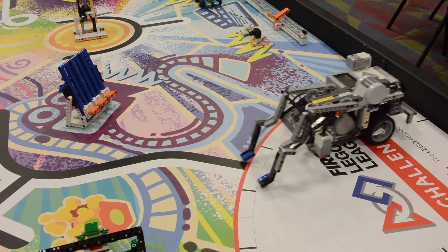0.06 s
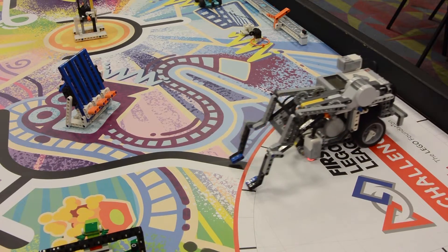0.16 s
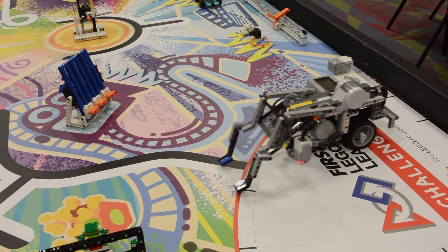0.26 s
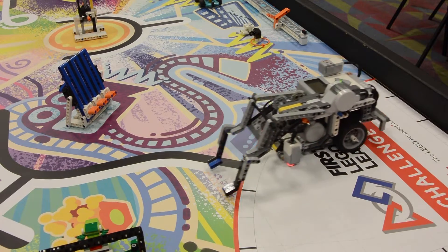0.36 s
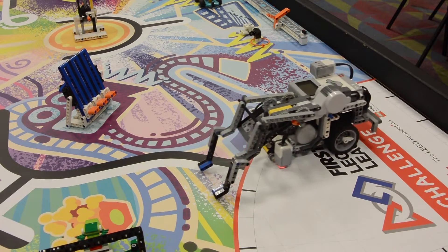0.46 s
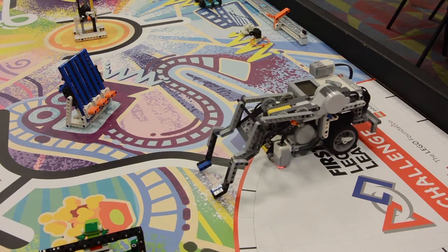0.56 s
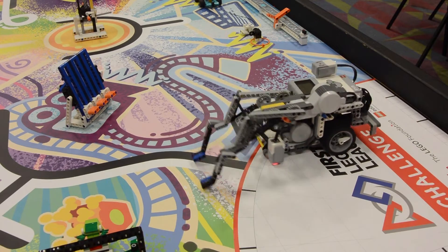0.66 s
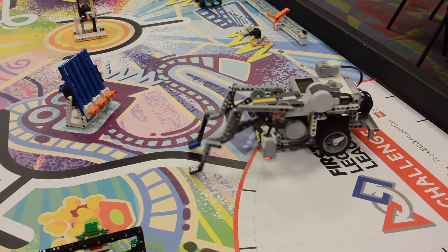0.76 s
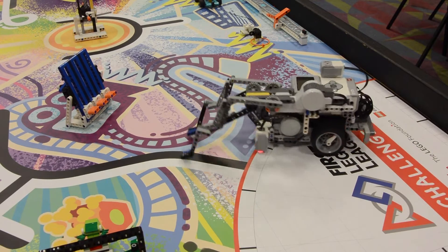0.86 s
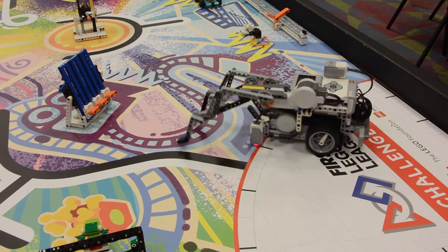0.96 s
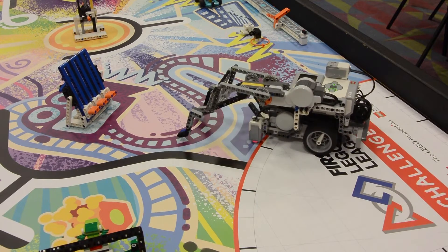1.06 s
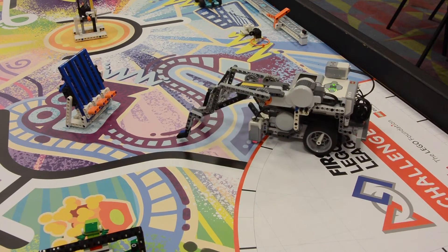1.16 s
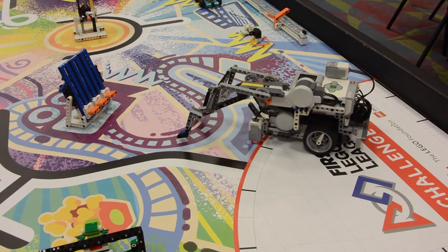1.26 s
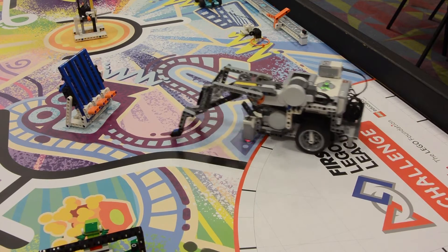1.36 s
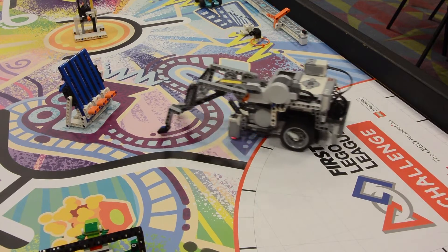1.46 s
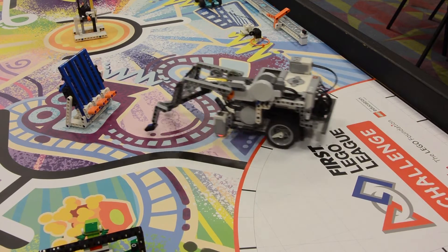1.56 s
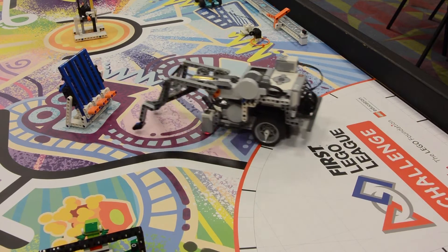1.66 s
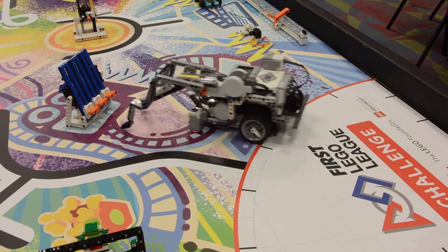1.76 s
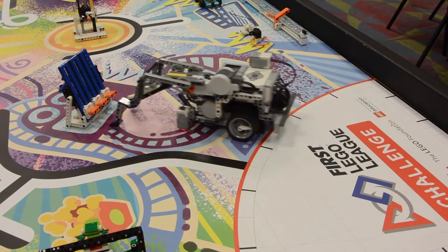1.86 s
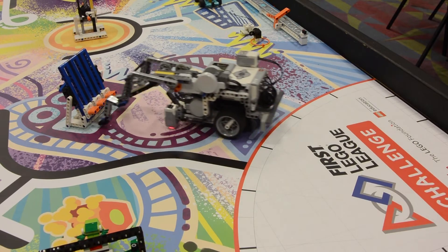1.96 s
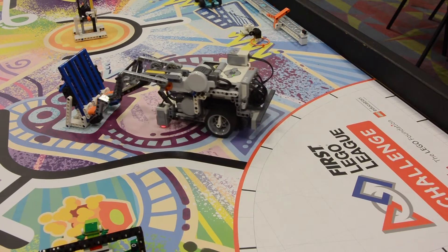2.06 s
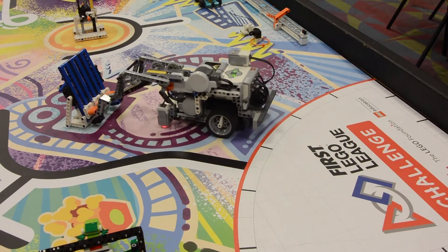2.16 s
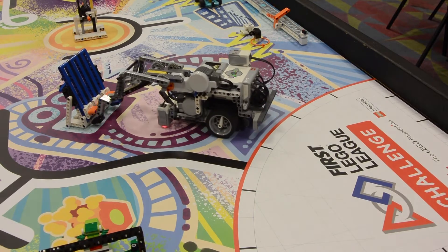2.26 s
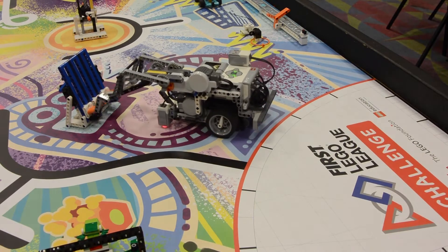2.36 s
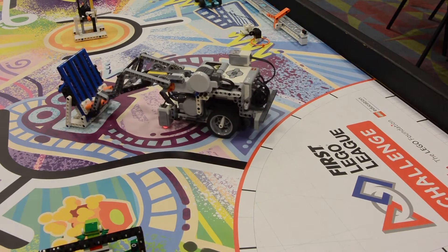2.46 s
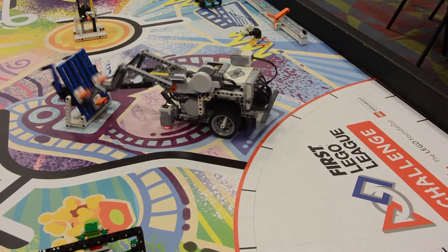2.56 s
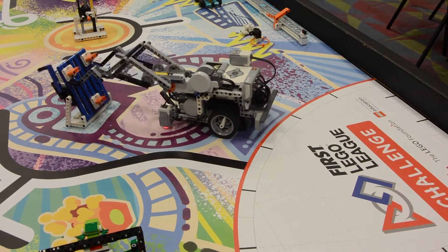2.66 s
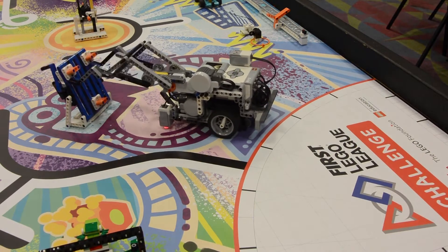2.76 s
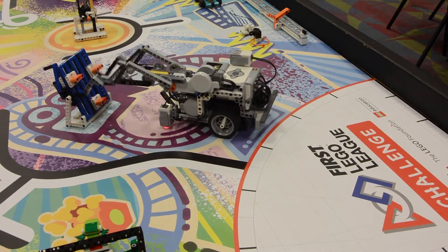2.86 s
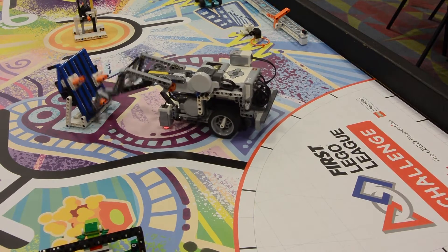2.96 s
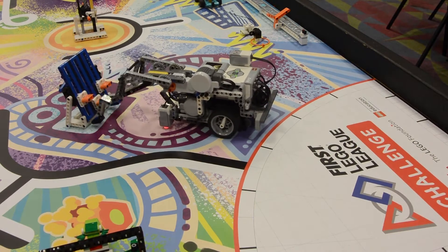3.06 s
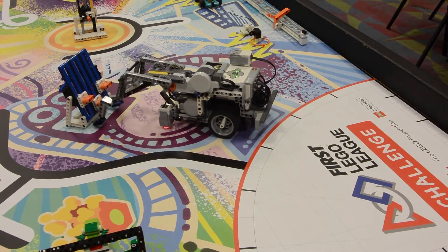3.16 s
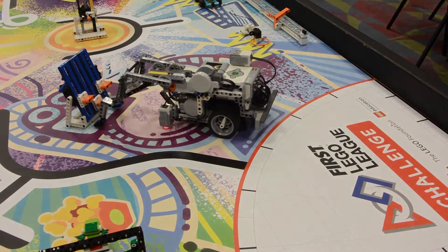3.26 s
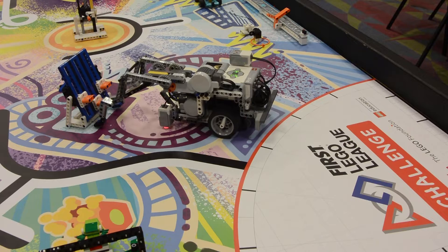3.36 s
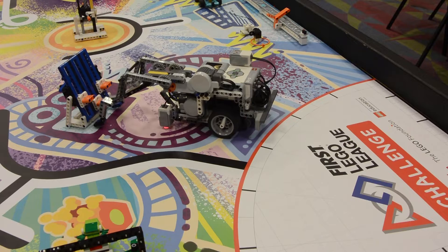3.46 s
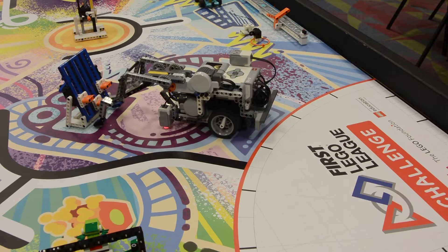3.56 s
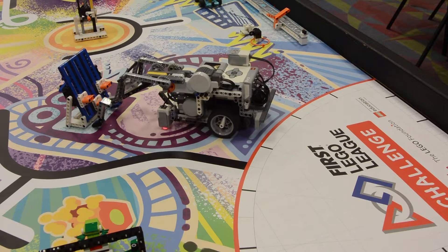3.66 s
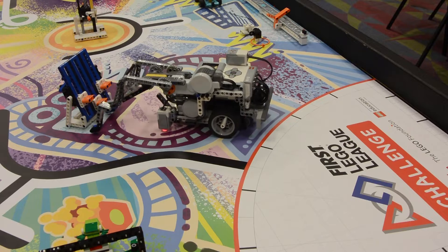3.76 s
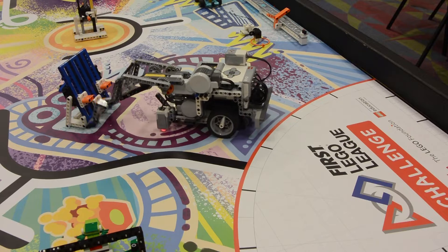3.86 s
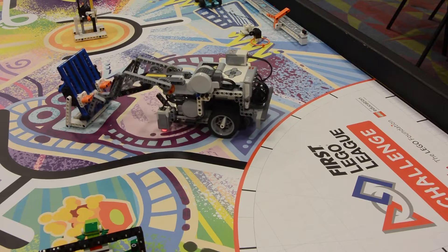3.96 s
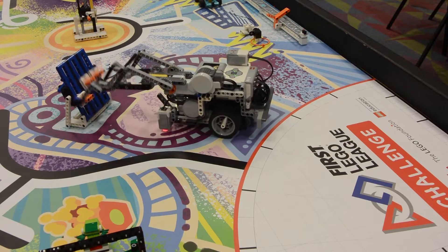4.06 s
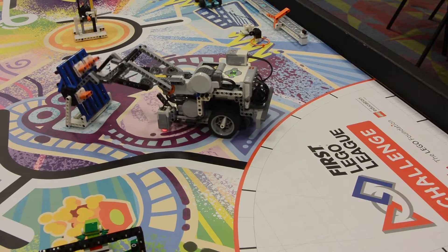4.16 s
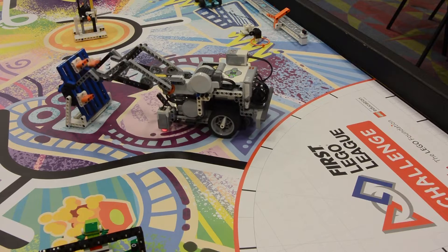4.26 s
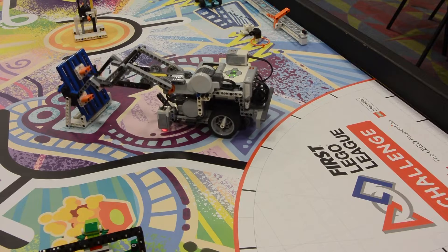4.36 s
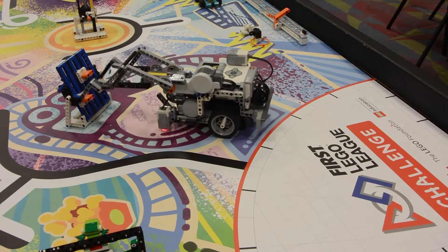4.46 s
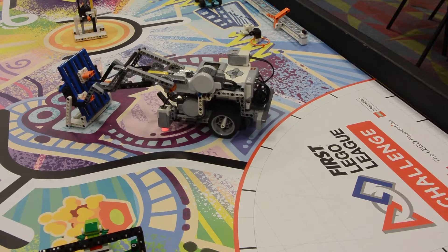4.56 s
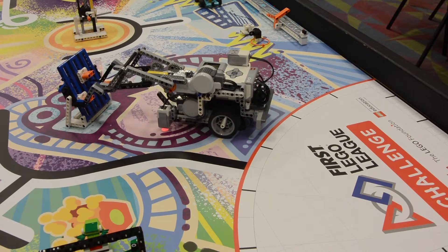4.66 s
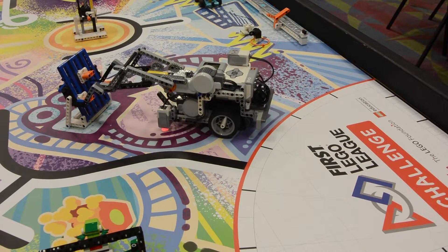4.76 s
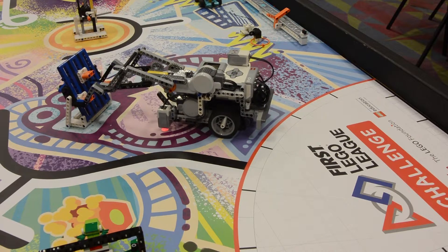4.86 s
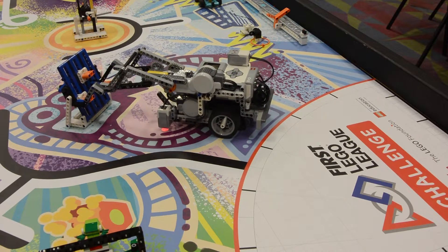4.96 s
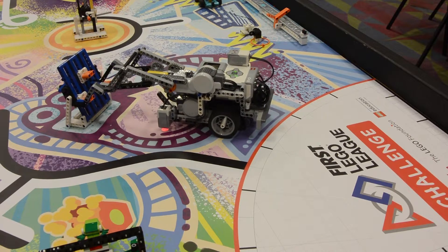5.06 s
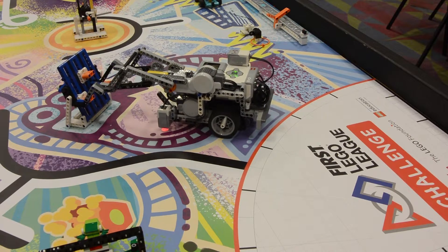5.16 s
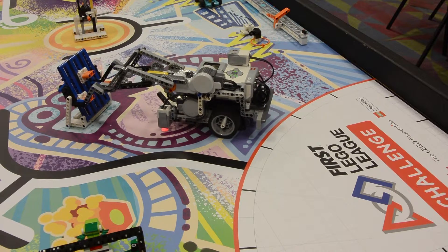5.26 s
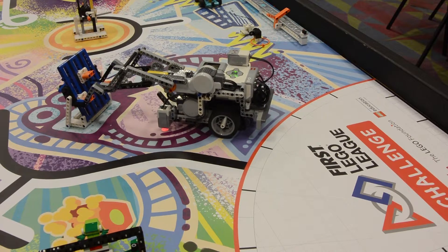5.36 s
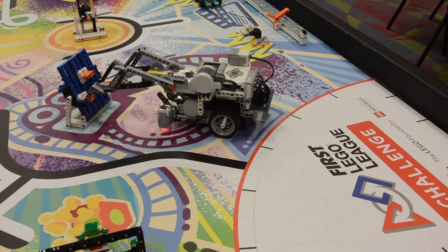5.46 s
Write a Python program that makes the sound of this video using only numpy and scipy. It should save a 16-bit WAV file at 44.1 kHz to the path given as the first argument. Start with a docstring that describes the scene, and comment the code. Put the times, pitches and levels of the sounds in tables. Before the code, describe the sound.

Small motors and plastic gears whir and rattle in three driving bursts, then an arm whines and clacks twice against a plastic model.

```python
"""A toy robot's rattling wheels are heard first: it drives over a table top in three bursts, then works
its arm twice against a plastic model. Motor and gear whine is a set of gliding lines and harmonics;
loose teeth are random ticks and hiss ringing the plastic housings; parts meet as clicks and knocks of
coloured noise. A small room of sparse echoes rings briefly over the hum of a fan, filtered noise for
room rumble and the hiss of a two-port microphone, and a few faint high blips."""
import sys
import numpy as np
from scipy import signal
from scipy.fft import rfft, irfft
from scipy.io import wavfile
from scipy.ndimage import uniform_filter1d

SR = 44100
rng = np.random.default_rng(int(sys.argv[2]) if len(sys.argv) > 2 else 0)


def dump(signal):
    """Clip the signal to [-1, 1] and save it as 16-bit WAV at the path in sys.argv[1]."""
    limited = np.clip(np.atleast_2d(signal).T, -1, 1)
    pcm = np.round(limited * 32767).astype(np.int16)
    wavfile.write(sys.argv[1], SR, pcm)


N = 242550  # samples

# arm motor speed under load, one table a pull: t/s, tooth mesh f/Hz
ARM_MESH = [
    [(2.4435, 110), (2.5, 340), (2.518, 371), (2.535, 377), (2.56, 362), (2.59, 335), (2.62, 314),
     (2.682, 313), (2.72, 355), (2.765, 410)],
    [(3.944, 95), (3.97, 240), (4.0, 345), (4.035, 389), (4.08, 357), (4.12, 330), (4.165, 341), (4.2, 382),
     (4.235, 433), (4.285, 430)],
    [(4.3505, 60), (4.375, 230), (4.41, 330), (4.445, 250)],
    [(4.54, 444), (4.56, 426), (4.595, 397), (4.655, 380)],
]
# broad colour of the arm housing: f/Hz, relative level/dB per Hz
ARM_HOUSING = [(240, -77), (400, -25), (1330, -12), (1470, -8.5), (2040, -5), (2930, -0.5), (3590, -3.5),
               (4500, -8), (5630, -5), (8000, -1.5), (10400, -18), (17600, -120)]
# pitch waver of a gliding line, as a share per (pitch change share per s)
BLUR_S = .012


def gain_of(db):
    """Turns dB into an amplitude gain."""
    return 10 ** (np.asarray(db) / 20)


def evened(x):
    """Scales to rms 1."""
    return x / np.sqrt(np.mean(x ** 2) + 1e-20)


def read(points, hz):
    """Reads a spectrum table on a log-frequency axis."""
    f, value = np.transpose(points)
    return np.interp(np.log(hz + 1), np.log(f + 1), value)


def add(mix, s, sound):
    """Mixes a sound in at time s, cut at the end of the mix."""
    part = mix[round(max(s, 0) * SR):][:len(sound)]
    part += sound[:len(part)]


def unroll(rows):
    """Gives the start time of a table and its columns interpolated to every sample."""
    s, *columns = np.transpose(rows)
    t = np.arange(s[0], s[-1], 1 / SR)
    return s[0], [np.interp(t, s, c) for c in columns]


def wander(size, seconds):
    """Slow random drift of rms 1: noise smoothed twice over the given time."""
    span = round(seconds * SR)
    smooth = uniform_filter1d(rng.standard_normal(size), span)
    return evened(uniform_filter1d(smooth, span))


def housing(colour, modes, base_db):
    """Minimum-phase impulse response of a plastic shell: a broad colour with resonances standing on it."""
    hz = abs(np.fft.fftfreq(4096, 1 / SR))
    power = gain_of(2 * (read(colour, hz) + base_db)) + 1e-10
    for f, width, db in modes:
        power = power + gain_of(2 * db) / (1 + (2 * (hz - f) / width) ** 2) ** 2
    log_gain = np.log(power) / 2
    phase = -signal.hilbert(log_gain).imag
    return np.fft.ifft(np.exp(log_gain + 1j * phase)).real[:2048]


def rattle(size, ticks_per_s, spread_db, hiss):
    """Loose teeth tick at random with uneven force, over the hiss of sliding plastic."""
    force = gain_of(spread_db * np.minimum(rng.exponential(1, size), 4))
    struck = rng.random(size) < ticks_per_s / SR
    ticks = force * rng.standard_normal(size) * struck
    return evened(evened(ticks) + hiss * rng.standard_normal(size))


def teeth(hz):
    """Amplitude beat with one decaying burst for every tooth that meets, at an even mean power."""
    decay_s, floor = .0016, .16  # the floor keeps some sound between the bursts
    since_s = (np.cumsum(hz) / SR % 1) / hz
    gate = floor + np.exp(-since_s / decay_s)
    return gate / np.sqrt(uniform_filter1d(gate ** 2, 600))


def air():
    """Room rumble and microphone hiss: slightly patchy noise, partly alike in the two ports."""
    level_db = -58  # rms
    # colour of the air: f/Hz, relative level/dB per Hz
    air_colour = [(12, -39.5), (20, -5), (27, -10), (81, -46), (112, -8.5), (256, -9), (390, -11),
                  (722, -10), (1300, -16), (10100, -25.5), (13700, -29), (16200, -35)]
    # left-right likeness: f/Hz, correlation [-1 to 1]
    likeness = [(60, 0.97), (180, 0.96), (550, 0.85), (1650, 0.28), (4970, -0.25), (15000, 0.5)]
    frames, hz = N // 256 + 5, np.fft.rfftfreq(1024, 1 / SR)
    a, b, c, d, patches = rng.standard_normal((frames, 513, 5)).T
    patches_db = evened(uniform_filter1d(uniform_filter1d(patches, 8, 0), 14, 1))
    same = np.clip(read(likeness, hz), -1, 1)[:, None]
    left = a + 1j * b
    right = same * left + np.sqrt(1 - same ** 2) * (c + 1j * d)
    z = np.array([left, right]) * gain_of(read(air_colour, hz)[:, None] + patches_db)
    return gain_of(level_db) * evened(signal.istft(z, nperseg=1024, noverlap=768)[1][:, :N])


def fan():
    """A wavering line, its height and phase drifting slowly, over a low hum that swells and ebbs."""
    # wavering line: f/Hz, width/Hz (sets the drift speed), peak level/dB before the drift
    fan_lines = [(708, 5, -66.5)]
    # swell of the hum: t/s, rms level/dB before its flutter
    hum_level = [(0, -80), (.75, -76.5), (1, -66.5), (1.55, -70), (1.64, -76), (4.6, -77), (4.75, -68.5),
                 (5.28, -71), (5.4, -80)]
    hum_hz = 118
    t = np.arange(N) / SR
    out = np.zeros(N)
    for hz, width, db in fan_lines:
        height = gain_of(db) * (1 + wander(N, .5 / width) / 5)
        out += height * np.cos(2 * np.pi * hz * t + wander(N, .5 / width))
    hum_gain = gain_of(np.interp(t, *np.transpose(hum_level)) + 2.0 * wander(N, 0.072))
    hum = np.sin(2 * np.pi * hum_hz * t + 0.53 * wander(N, 0.089))
    return out + np.sqrt(2) * hum_gain * hum


def blips():
    """A few faint high blips: a sine with a jittering phase under bell-shaped envelopes."""
    # middle of each blip: t/s, rms level/dB at its top
    blip_rows = [(3.48, -76), (4.945, -76), (5.45, -74)]
    blip_hz, width_s = 11400, .03  # width between the 1/e points
    t = np.arange(N) / SR
    envelope = sum(gain_of(db) * np.exp(-((t - s) / width_s * 2) ** 2) for s, db in blip_rows)
    return np.sqrt(2) * envelope * np.sin(2 * np.pi * blip_hz * t + 3 * wander(N, .003))


def room(x):
    """Three tails of random echoes, each band dying at its own speed, take turns to keep the room's colour even."""
    # reverberation: f/Hz, t60/s
    t60 = [(500, 0.09), (1500, 0.53), (4000, 0.47), (9000, 0.38), (15000, 0.22)]
    taps = np.zeros((3, 2, 22000))  # tail, port, sample
    at = np.arange(60, 21980, 20) + rng.integers(0, 20, (3, 2, 1096))
    np.put_along_axis(taps, at, rng.choice([-1., 1.], at.shape), 2)
    hz, t, z = signal.stft(taps, SR, nperseg=256)
    decay = gain_of(-60 * t / read(t60, hz)[:, None])
    tails = signal.istft(z * decay, SR, nperseg=256)[1]
    tails = tails / np.linalg.norm(tails[0, 0])
    # a steady rotation; the squared shares of the three tails always sum to 1
    turn = np.arange(N) / SR / .15 + np.arange(3)[:, None] / 3
    share = np.cos(np.pi * turn) * np.sqrt(2 / 3)
    return signal.fftconvolve((share * x)[:, None], tails, axes=2).sum(0)[:, :N]


def radiate(x):
    """Many parts sound from shifting places: colour drifts in patches and the two ports hear unlike phases."""
    # phase spread between the ports: f/Hz, rms phase/radians
    scatter = [(300, 0.092), (1000, 0.2), (2500, 1.06), (5000, 0.96), (9000, 0.94), (14000, 1.94)]
    patchy_db = .7  # rms
    hz, t, z = signal.stft(x, SR, nperseg=256, noverlap=192)
    colour, phase = rng.standard_normal((len(t), len(hz), 2)).T
    colour = evened(uniform_filter1d(uniform_filter1d(colour, 4, 0), 30, 1))
    phase = evened(uniform_filter1d(uniform_filter1d(phase, 4, 0), 150, 1))
    turn = np.exp(.5j * read(scatter, hz)[:, None] * phase)
    ports = z * gain_of(patchy_db * colour) * np.array([turn, 1 / turn])
    return signal.istft(ports, SR, nperseg=256, noverlap=192)[1][:, :N]


def growl(gain):
    """Low rattle in the table top: sparse, uneven ticks through the colour of the board."""
    # colour of the table: f/Hz, relative level/dB per Hz
    table_colour = [(150, -21), (330, -11.5), (560, 2), (1000, -6.5), (1400, -1.5), (2000, -26)]
    ticks = rattle(N, 800, 2.2, 0.5)
    return gain * evened(signal.oaconvolve(ticks, housing(table_colour, [], 0))[:N])


def burst(colour, luck, rise_s, t60):
    """A sharp contact and dense short-lived plastic modes as a coloured puff of noise; peak 1."""
    t = np.arange(len(luck)) / SR
    contact = 2. * (np.arange(len(luck)) == round(rise_s * SR))
    puff = luck * gain_of(-60 * t / t60) * (1 - np.exp(-t / rise_s))
    sound = signal.oaconvolve(contact + puff, housing(colour, [], 0))
    return sound / abs(sound).max()


def clicks():
    """Plastic parts meet: a bright snap, the hollow part behind it, and a slower thud through the table."""
    # contacts: t/s, snap peak level/dB, thud level/dB relative to the snap
    contacts = [(0.591, -29.5, -36), (0.621, -31, -35), (0.635, -33, -36), (0.6473, -28, -40),
                (0.66, -33, -33), (0.662, -29, -36), (1.1488, -29, -31), (1.154, -35, -32),
                (1.1735, -39, -28), (1.1815, -39, -27), (1.271, -43, -16), (1.3781, -40, -4.5),
                (2.14, -21.5, -49), (2.151, -20, -26), (2.279, -35, -14), (2.328, -32.5, -16),
                (2.6, -17.5, -20), (2.6959, -15.5, -28), (2.7478, -11.5, -22.5), (2.8052, -23, -12.5),
                (2.8865, -30, -46), (2.9066, -26, -40), (2.9166, -24, -32), (2.939, -25, -37),
                (2.957, -15, -16), (2.981, -27, -41), (2.985, -28, -40), (2.9917, -23, -40),
                (3.0448, -22, -13), (3.142, -19.5, -15), (3.1547, -13, -21), (3.691, -37.5, -24),
                (3.716, -32.5, -30), (3.7717, -22, -37), (3.841, -35, -35.5), (3.868, -30, -34),
                (3.872, -27.5, -34), (3.944, -28, -29), (4.13, -16, -27), (4.143, -12.5, -36),
                (4.2035, -26.5, -8.5), (4.3198, -14.5, -20), (4.35, -19, -14), (4.427, -21, -36),
                (4.4335, -21, -43), (4.448, -21.5, -19), (4.4632, -11, -28)]
    # colours of the three parts: f/Hz, relative level/dB
    snap_colour = [(3500, -32), (5800, -7.5), (8000, 0.5), (10000, -7.5), (12000, -19), (16000, -29)]
    body_colour = [(700, -21), (1400, -8), (2700, -2.5), (4200, -0.5), (6000, -30.5)]
    thud_colour = [(90, -35), (170, -7.5), (550, -6.5), (900, -8), (1400, -16)]
    # harder clicks are more snap and less body: body dB relative to the snap
    body_db, body_per_db = -13.5, -0.14
    # softer clicks snap lower, by this share of the pitch per dB under the hardest
    drop_per_db = .011
    out = np.zeros(N)
    luck = rng.standard_normal((len(contacts), 3, 4000))
    hardest = max(row[1] for row in contacts)
    for (s, db, thud_db), (a, b, c) in zip(contacts, luck):
        lowered = np.multiply(snap_colour, [1 - drop_per_db * (hardest - db), 1])
        snap = burst(lowered, a, 0.0006, 0.011)
        body = gain_of(body_db + body_per_db * db) * burst(body_colour, b, 0.000997, 0.016)
        thud = gain_of(thud_db) * burst(thud_colour, c, 0.0028, 0.15)
        add(out, s, gain_of(db) * (snap + body + thud))
    return out


def lurch():
    """A swell as the third run gets under way: climbs from 0 to 1, then breaks off."""
    # t/s of the start, the top and the end
    lurch_s = (1.43, 1.553, 1.562)
    return np.interp(np.arange(N) / SR, lurch_s, [0, 1, 0])


def wheel_level(t, start, off, first_db, last_db):
    """Level in dB: spins up, holds with a straight drift, and coasts down once the power is off."""
    spin_up_s, spin_up_db, coast_db_per_s = 0.039, -23, -260
    held_db = np.interp(t, [start, off], [first_db, last_db])
    spin_up = spin_up_db * np.exp(-(t - start) / spin_up_s)
    return held_db + spin_up + coast_db_per_s * np.maximum(t - off, 0)


def wheel_run(row, throbs, ring_in_s, modes, colour):
    """The rattle starts tooth by tooth, then throbs with the shafts while the housing begins to ring."""
    kick_hz, kick_fade_s = 125, .05  # single teeth heard at the start of a run
    ring_out_s, ring_swell_db = .04, 1.2  # ringing stops after power off, and is uneven before
    lurch_rattle_db, lurch_ring_db = 5, 4.5  # gains at the top of the lurch
    start, off = row[:2]
    s = max(start, 0)
    t = np.arange(s, off + .2, 1 / SR)
    size = len(t)
    swell = lurch()[round(s * SR):][:size]
    db = wheel_level(t, *row) + lurch_rattle_db * swell
    # the shafts turn about 2.5 times as fast as the throb table's unit speed
    travel = np.cumsum(2.5 + 0.015 * wander(size, 0.029)) / SR
    throb = 1 + sum(depth * np.cos(2 * np.pi * hz * travel) for hz, depth in throbs)
    kick = np.exp(-(t - start) / kick_fade_s)
    beat = 1 + kick * (teeth(kick_hz * np.ones(size)) - 1)
    drive = throb * beat * rattle(size, 5000, .8, 1.)
    # every other resonance swells together, in two independent halves
    dull, *halves = (signal.oaconvolve(drive, housing(colour, m, -4.0))[:size]
                     for m in ([], modes[::2], modes[1::2]))
    ringing = np.zeros(size)
    for half in halves:
        ring_db = lurch_ring_db * swell + ring_swell_db * wander(size, 0.02)
        ringing += gain_of(ring_db) * (half - dull)
    ring_share = np.clip(np.minimum((t - start) / ring_in_s, 1 - (t - off) / ring_out_s), 0, 1)
    gears = evened(dull + ring_share * ringing)
    return s, gain_of(db + .3 * wander(size, .02)) * gears * signal.windows.tukey(size, .01)


def wheel_whine(start, end, start_hz, end_hz, db):
    """One motor or mesh line that wavers a little with the load, and smears while it glides."""
    size = round((end - start) * SR)
    hz = np.linspace(start_hz, end_hz, size)
    blur = BLUR_S * abs(np.log(end_hz / start_hz)) / (end - start)
    hz = hz * (1 + 0.008 * wander(size, 0.02) + blur * wander(size, .002))
    swell = gain_of(db + 3. * wander(size, 0.018)) * signal.windows.tukey(size, .25)
    return start, np.sqrt(2) * swell * np.cos(2 * np.pi * np.cumsum(hz) / SR)


def surges():
    """Gains of arm rattle, chatter and growl: each surge rises, holds and falls; overlapping powers add."""
    # full at t/s, rise/s, hold/s, gear rattle level/dB, then relative to it:
    # chatter of rubbing parts level/dB, table growl level/dB
    arm_surges = [(1.159, 0.0045, 0.028, -51.5, -6, -25), (2.481, 0.055, 0.042, -39.5, 7.5, -15.5),
                  (2.574, 0.13, 0.068, -41, -3.5, -18.5), (2.719, 0.086, 0.02, -36.5, 6, -13),
                  (2.804, 0.0046, .01, -41, -4, -19), (2.878, 0.065, 0.016, -39, 9.5, -40),
                  (2.946, 0.024, 0.019, -39.5, 10, -16), (3.007, .02, 0.066, -48, 8.5, -13.5),
                  (3.079, 0.0026, 0.038, -40, 10, -20), (3.14, 0.024, 0.016, -40, -10, -10),
                  (3.698, 0.011, 0.097, -50, -4, -13.5), (3.858, 0.067, 0.014, -46.5, -3.5, -29),
                  (3.992, 0.06, 0.02, -37.5, 8, -21), (4.038, 0.04, 0.049, -40, -0.5, -44),
                  (4.129, 0.024, 0.076, -39, -1, -14.5), (4.229, 0.097, 0.028, -35, 2.5, -15),
                  (4.317, 0.012, 0.059, -42, -4, -8.5), (4.403, 0.074, 0.007, -33, 8, -29),
                  (4.52, 0.027, 0.029, -52, 5, -18), (4.558, 0.067, 0.078, -43, 6, -20)]
    rise_db, fall_db_per_s = -32.5, -430  # rise_db: level one rise time before full
    power, t = np.zeros((3, N)), np.arange(N) / SR
    for full, rise, hold, db, chatter_db, growl_db in arm_surges:
        rising_db = rise_db * np.maximum(full - t, 0) / max(rise, .001)
        falling_db = fall_db_per_s * np.maximum(t - full - hold, 0)
        shape_db = np.maximum(rising_db + falling_db, -200)
        levels_db = db + np.array([[0], [chatter_db], [growl_db]])
        power += gain_of(2 * levels_db) * gain_of(2 * shape_db)
    return np.sqrt(power)


def arm_move(rattle_gain, chatter_gain):
    """Gear rattle low down, and chatter ringing thin beams near 7 kHz; both beat with the teeth in a pull."""
    # resonances of gears and beams: f/Hz, full width/Hz at -6 dB, relative level/dB
    gear_modes = [(2690, 260, -1.5), (4200, 300, -4.5), (5900, 670, -2)]
    beam_modes = [(7290, 360, 6.5), (8870, 320, -1), (6370, 440, -4)]
    # broad colour of the chatter: f/Hz, relative level/dB per Hz
    chatter_colour = [(2940, -29), (5000, -8.5), (7240, -10), (7940, -3.5), (8910, -7), (9950, -14),
                      (13000, -16.5), (15800, -31)]
    ring_from_db, ring_full_db = -50, -35  # the beams ring only under strong chatter
    slip_hz = 210  # between pulls the rubbing parts stick and slip about this often
    beat = np.ones(N)
    slip = teeth(slip_hz * gain_of(2.5 * wander(N, .004)))
    for rows in ARM_MESH:
        s, (hz,) = unroll(rows)
        tooth = teeth(hz)
        add(beat, s, tooth - 1)
        add(slip, s, tooth - slip[round(s * SR):][:len(hz)])  # the teeth replace the slips
    gears = signal.oaconvolve(beat * rattle(N, 4000, 0.65, 1.05), housing(ARM_HOUSING, gear_modes, -1.7))[:N]
    slips = slip * rattle(N, 6000, .6, 1.2)
    dull, ringing = (evened(signal.oaconvolve(slips, housing(chatter_colour, m, 0))[:N])
                     for m in ([], beam_modes))
    share = np.interp(20 * np.log10(chatter_gain), [ring_from_db, ring_full_db], [0, 1])
    chatter = (dull + share * (ringing - dull)) * gain_of(1.1 * wander(N, .003))
    return rattle_gain * evened(gears) + chatter_gain * evened(chatter)


def whine(turns, colour, count):
    """Gliding whine of the arm gears: harmonics of the mesh pitch at random phases, each swelling on its own."""
    hz = np.gradient(turns) * SR
    swell_db = 2.2  # rms
    total = np.zeros(len(hz))
    for k in range(1, count):
        height = gain_of(read(colour, k * hz) + swell_db * wander(len(hz), 0.014))
        total += height * np.cos(2 * np.pi * (k * turns + rng.random()))
    return evened(total)


def arm_whine(rows, db, can_db):
    """Load sags the motor speed, so the whole stack of harmonics glides; brush hiss rings the motor can."""
    # weight of the harmonics: f/Hz, relative level/dB
    whine_colour = [(1200, -26), (1480, -5), (1750, -1), (2000, -5), (2200, -2), (2450, -5), (2800, 2),
                    (3300, 0), (3750, -9), (4300, -3), (4900, -8), (5600, -1), (7000, -14)]
    # the can rings under the brushes: f/Hz, full width/Hz at -6 dB, relative level/dB
    can_modes = [(5600, 560, -2)]
    # below free speed the whine grows quieter, and the can quieter still against it
    free_hz, whine_db_per_hz, can_db_per_hz = 375, .11, .12
    pull_in_s, pull_out_s = .02, .05
    s, (hz,) = unroll(rows)
    size = len(hz)
    # the stack smears while the motor gains speed
    speeding = np.maximum(np.gradient(np.log(hz)) * SR, 0)
    waver = .004 * wander(size, .005) + BLUR_S / 5 * speeding * wander(size, .002)
    turns = np.cumsum(hz * (1 + waver)) / SR
    brushes = teeth(hz) * rng.standard_normal(size)
    can = signal.oaconvolve(brushes, housing(ARM_HOUSING, can_modes, -30))[:size]
    t = np.arange(size) / SR
    fade = np.minimum(1, np.minimum(t / pull_in_s, t[::-1] / pull_out_s))
    sag_hz = np.clip(hz - free_hz, -90, 0)
    can_gain = gain_of(can_db_per_hz * sag_hz + can_db)
    sound = whine(turns, whine_colour, count=20) + can_gain * evened(can)
    return s, gain_of(db + whine_db_per_hz * sag_hz) * sound * fade


def scene():
    """The robot moves across the table top; the two microphone ports tilt its colour and place."""
    # wheel runs: start t/s, power off t/s, gear rattle level/dB at first, level/dB at last
    wheel_rows = [(-.3, 0.526, -28.5, -30), (.55, 1.038, -46, -41), (1.379, 2.089, -30.5, -29)]
    # shaft and gear turns the rattle throbs with, per run: f/Hz at unit speed, depth [0-1]
    shaft_throbs = [
        [(164, .12), (55, .08)],
        [(73.5, .3), (244, .25)],
        [(67, .08), (180, .08)],
    ]
    # build-up of the housing resonances, per run: time/s
    ring_in = [.001, .3, .001]
    # housing resonances, per run: f/Hz, full width/Hz at -6 dB, relative level/dB
    wheel_modes = [
        [(2160, 68, -9), (2860, 300, -9), (3510, 660, -10), (5020, 120, -6), (5690, 580, -1), (7400, 220, -8),
         (8720, 580, -9)],
        [(1750, 130, -7.5), (2470, 77, -7), (3690, 230, -2), (5640, 230, 0.5)],
        [(2160, 110, -17), (2850, 460, -5), (3690, 610, -0.5), (5560, 260, -2.5), (6500, 210, 0),
         (8060, 780, -2.5), (9070, 350, -3)],
    ]
    # broad housing colour, per run: f/Hz, relative level/dB per Hz
    wheel_colours = [
        [(410, -55), (700, -30), (1100, -25), (1500, -20), (2220, -8), (4580, -8), (5710, -4), (9980, -9),
         (15500, -48)],
        [(530, -51), (900, -26.5), (1710, -10.5), (3670, -4.5), (4230, -8), (5630, -6), (8500, -10.5),
         (11000, -21.5), (15500, -33)],
        [(350, -40), (600, -38), (687, -21), (1170, -16), (1620, -13), (1900, -4), (4810, -2), (6580, 2.5),
         (12000, -10.5), (15500, -40)],
    ]
    # lines of wheel motors and meshes: start t/s, end t/s, start f/Hz, end f/Hz, rms level/dB before swells
    wheel_lines = [(.053, .41, 380, 375, -65), (.048, .22, 1200, 1090, -59.5),
                   (.24, .54, 1087, 1085, -58.5), (.079, .55, 1635, 1620, -61), (.24, .53, 2175, 2165, -55),
                   (.76, 1.075, 1240, 1246, -64.5), (1.4, 1.49, 1250, 1800, -58),
                   (1.63, 2.12, 720, 675, -63.5), (1.6, 2.08, 1015, 945, -62.5),
                   (1.62, 2.11, 1385, 1335, -62), (1.58, 2.1, 1900, 1840, -55),
                   (1.62, 2.12, 2200, 2130, -54)]
    # whine of each arm pull at free speed: level/dB
    pull_db = [-37, -38, -46, -43.5]
    # ring of the motor can against the whine, per pull: level/dB
    can_db = [-2.5, -3, 0, -12]
    # place of the robot: t/s, left minus right level/dB
    place = [(0.0, -1.5), (3.35, 1.5), (4.7, 1.5)]
    # unlike colour of the ports: f/Hz, left minus right level/dB
    ports = [(60, -1), (120, 0), (240, -2), (480, -1), (950, -1.5), (1890, -3.5), (3770, -4), (7520, 2.5),
             (15000, -2)]
    lurch_growl_db = -58
    rattle_gain, chatter_gain, growl_gain = surges()
    robot = clicks() + arm_move(rattle_gain, chatter_gain)
    robot += growl(growl_gain + gain_of(lurch_growl_db) * lurch())
    for run in zip(wheel_rows, shaft_throbs, ring_in, wheel_modes, wheel_colours):
        add(robot, *wheel_run(*run))
    for row in wheel_lines:
        add(robot, *wheel_whine(*row))
    for pull in zip(ARM_MESH, pull_db, can_db):
        add(robot, *arm_whine(*pull))
    side = np.array([[.5], [-.5]])  # half of each difference to each port
    heard = gain_of(0.13) * radiate(robot) + gain_of(-9.5) * room(robot)
    heard = heard * gain_of(side * np.interp(np.arange(N) / SR, *np.transpose(place)))
    port_gain = gain_of(side * read(ports, np.fft.rfftfreq(N, 1 / SR)))
    heard = irfft(rfft(heard) * port_gain, N)
    return heard + air() + fan() + blips()


def record(dry):
    """The band limit: a steep linear-phase low-pass."""
    edge_hz = 15950
    low_pass = signal.firwin(511, edge_hz, window=("kaiser", 9), fs=SR)
    return signal.oaconvolve(dry, low_pass[None], "same")


dry = scene()
out = record(dry)
dump(out)
```